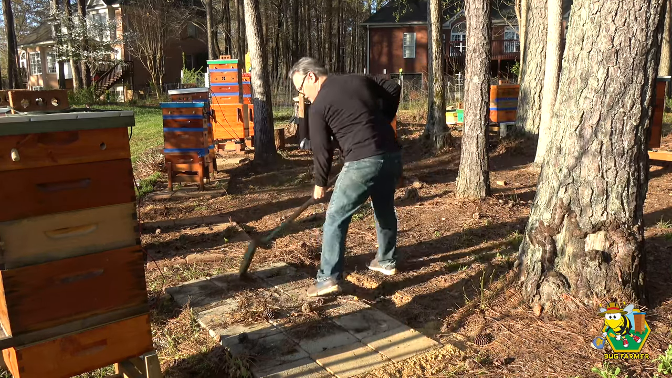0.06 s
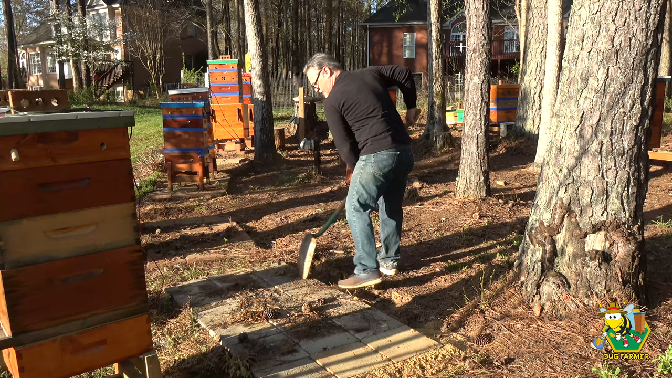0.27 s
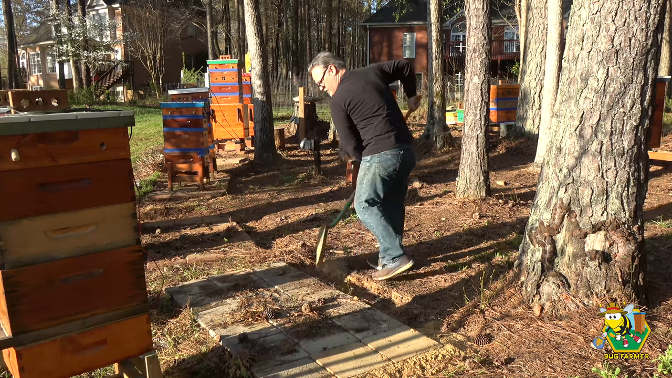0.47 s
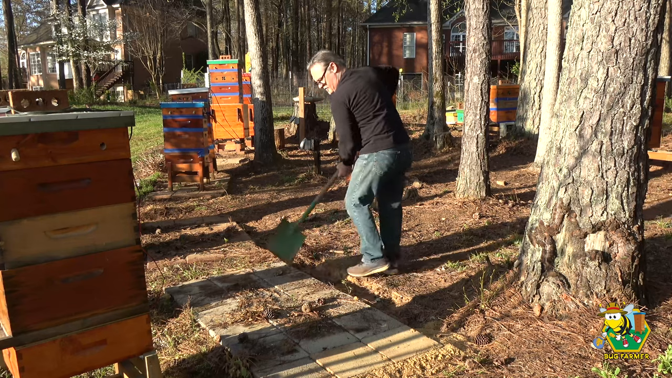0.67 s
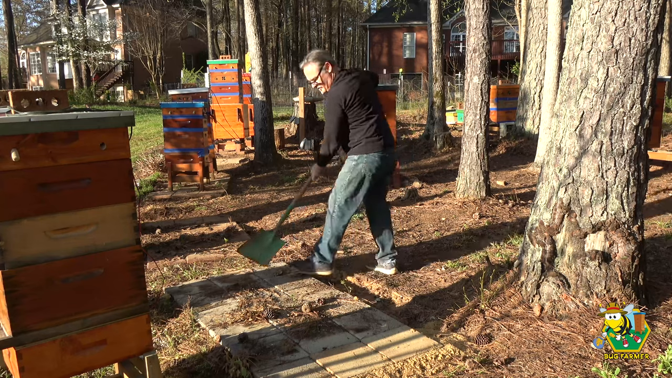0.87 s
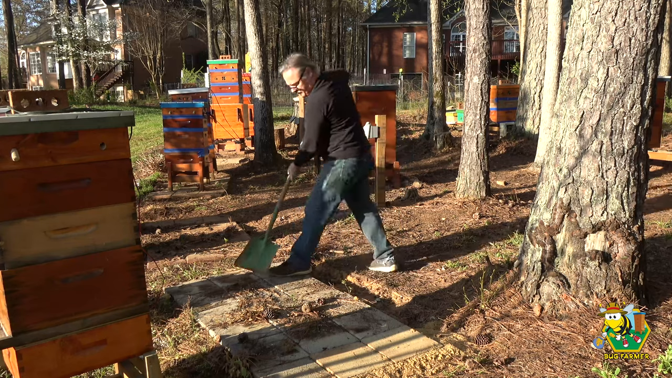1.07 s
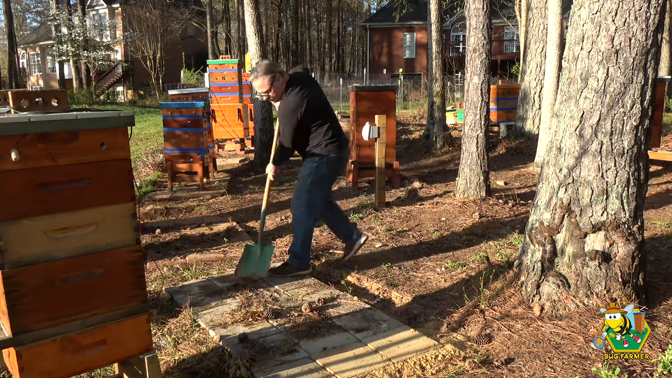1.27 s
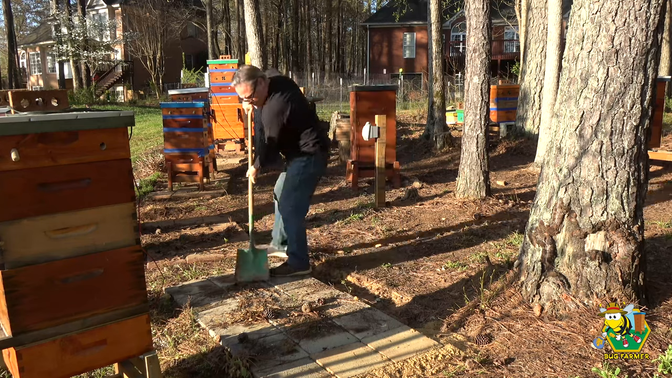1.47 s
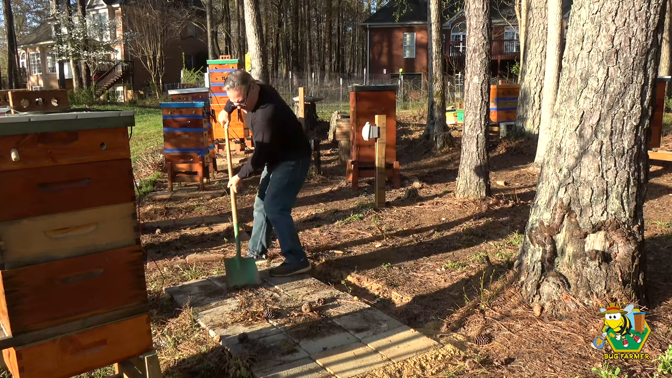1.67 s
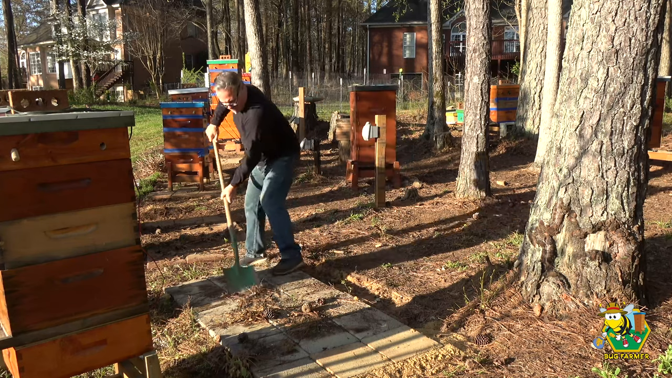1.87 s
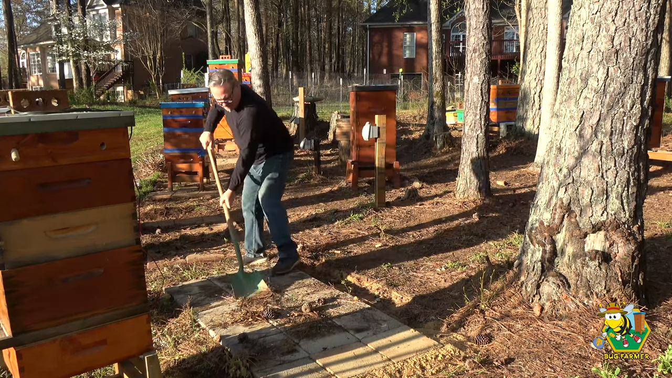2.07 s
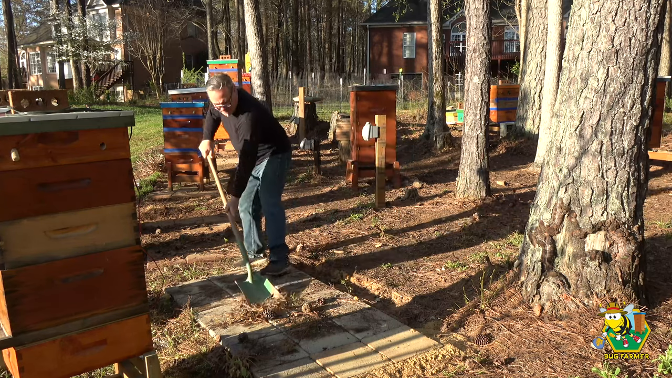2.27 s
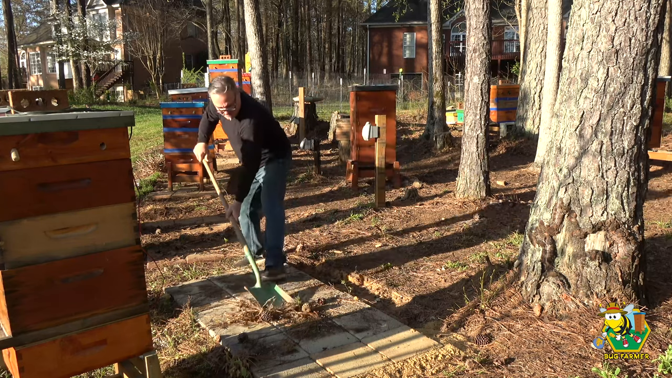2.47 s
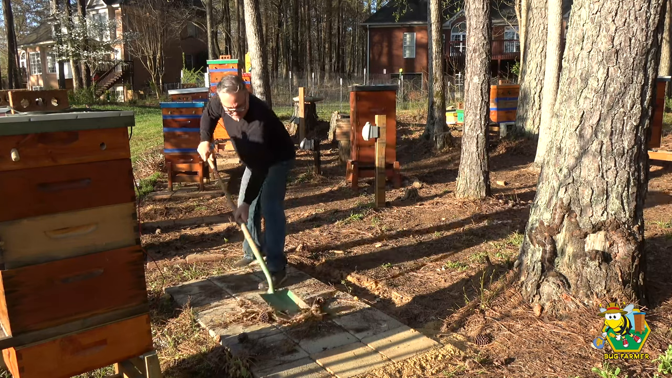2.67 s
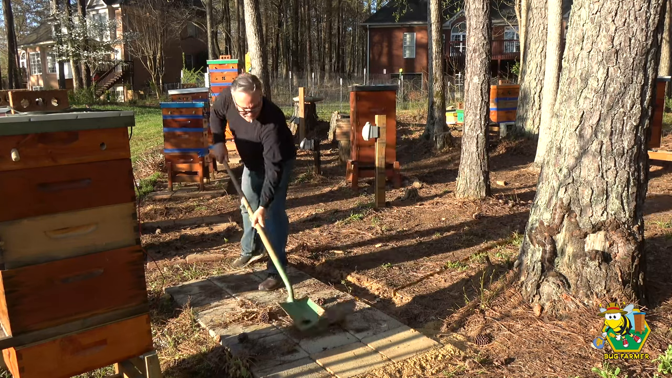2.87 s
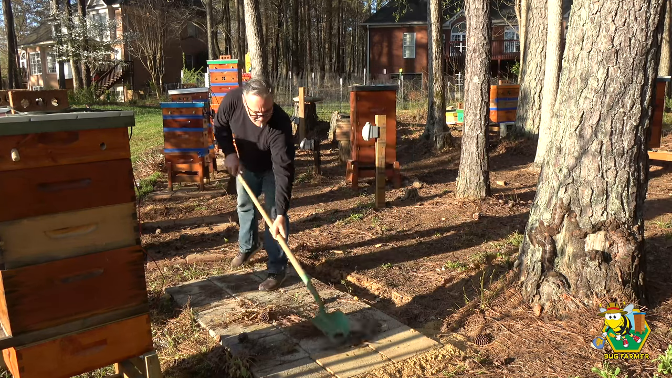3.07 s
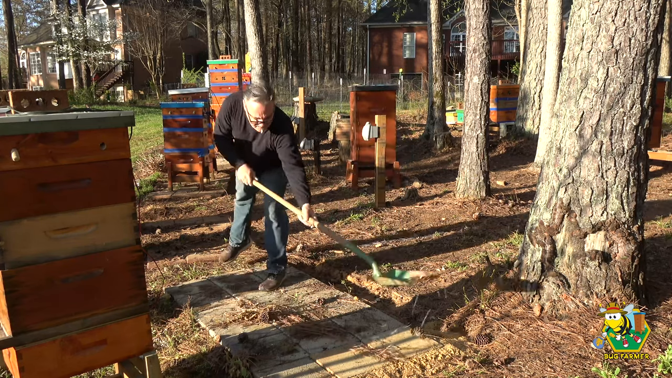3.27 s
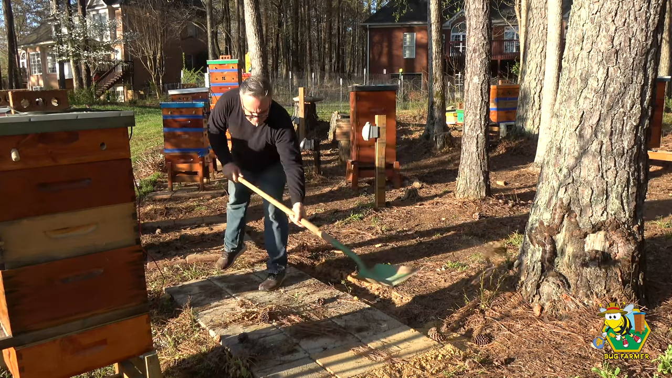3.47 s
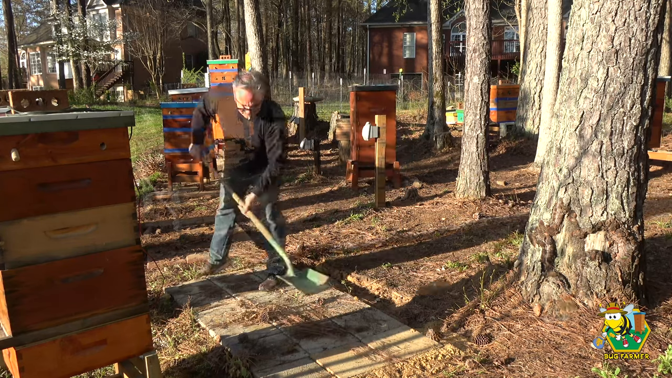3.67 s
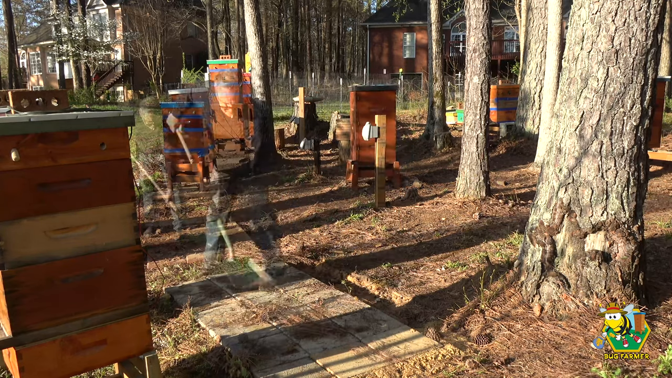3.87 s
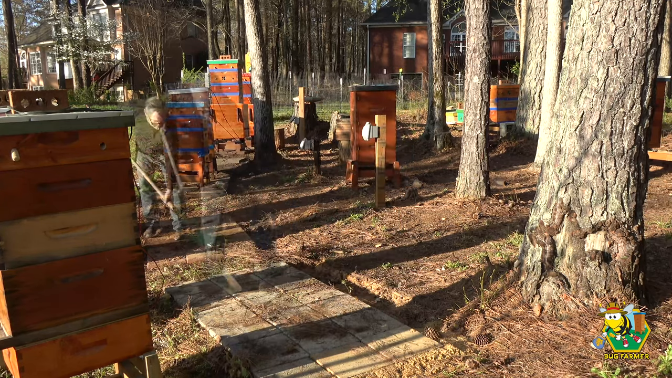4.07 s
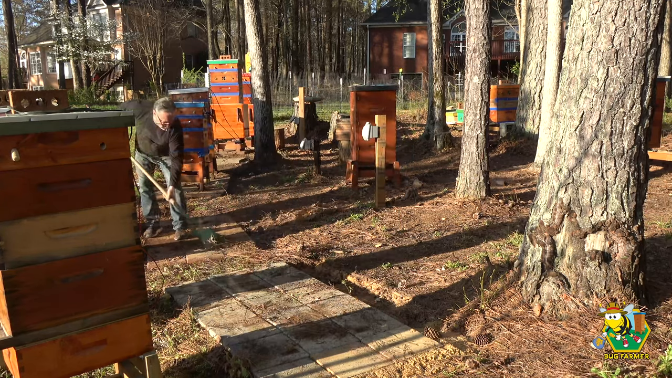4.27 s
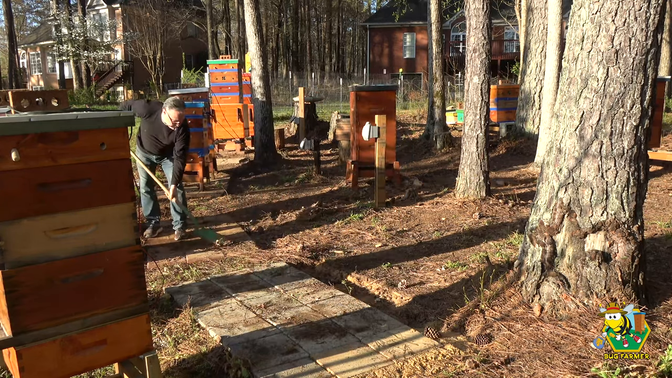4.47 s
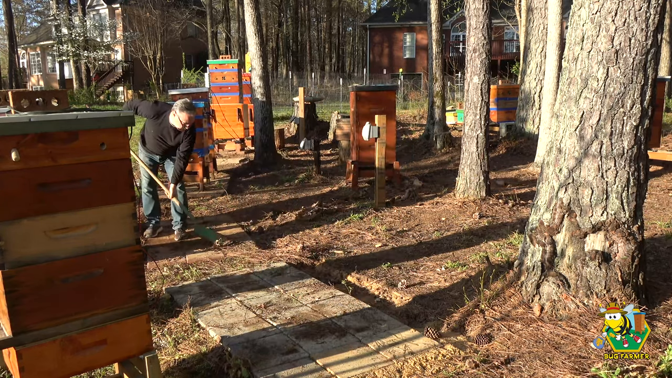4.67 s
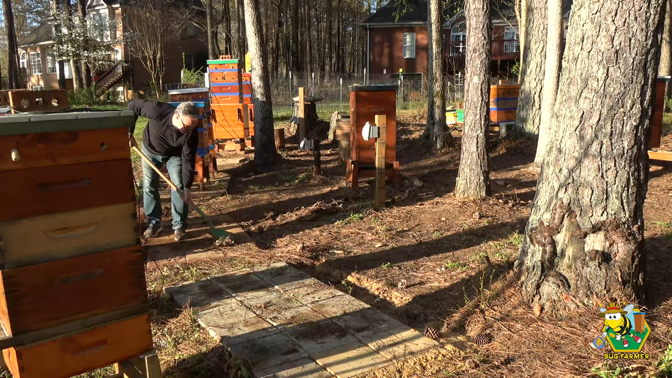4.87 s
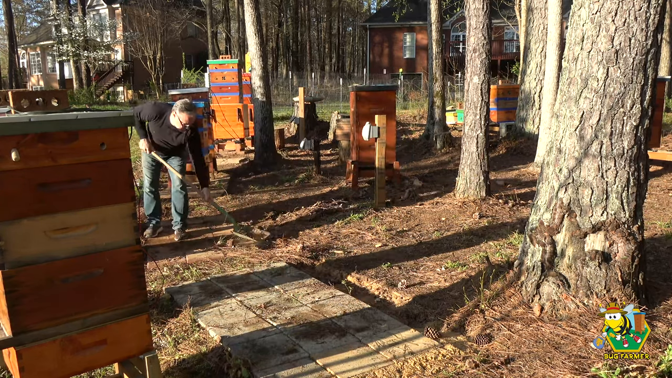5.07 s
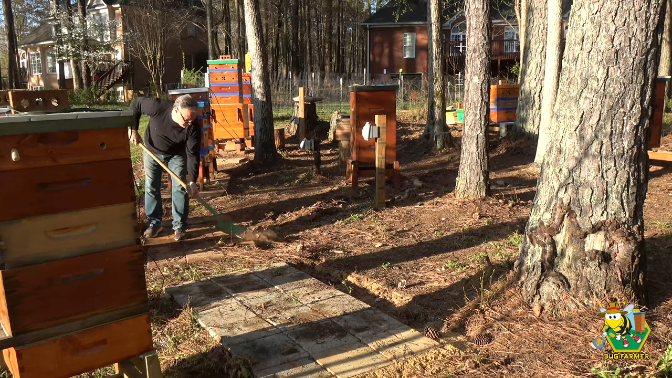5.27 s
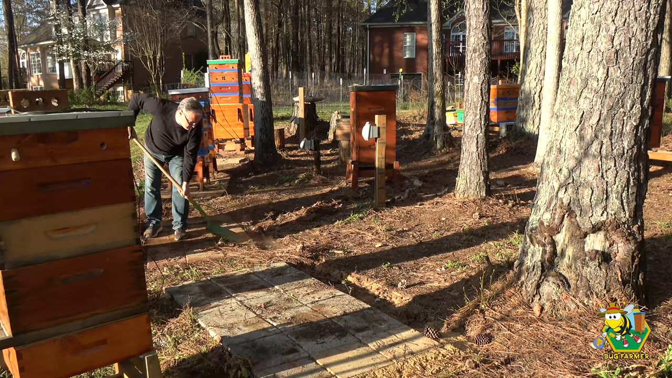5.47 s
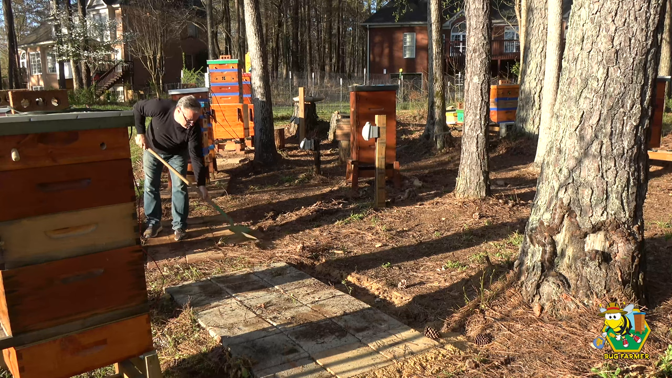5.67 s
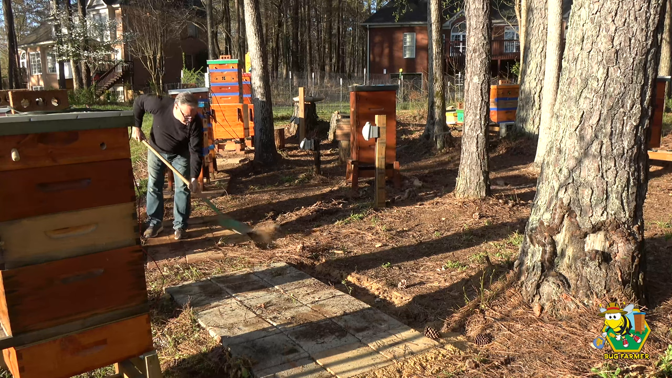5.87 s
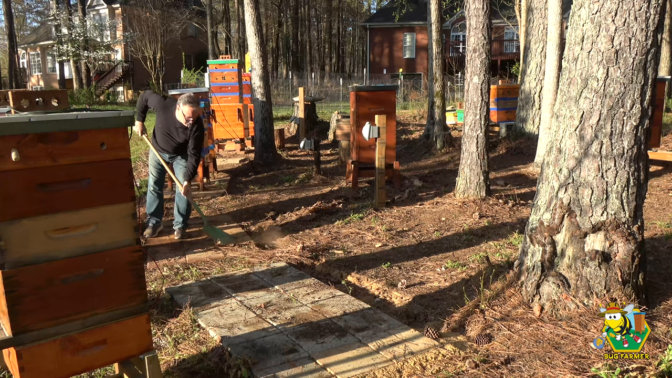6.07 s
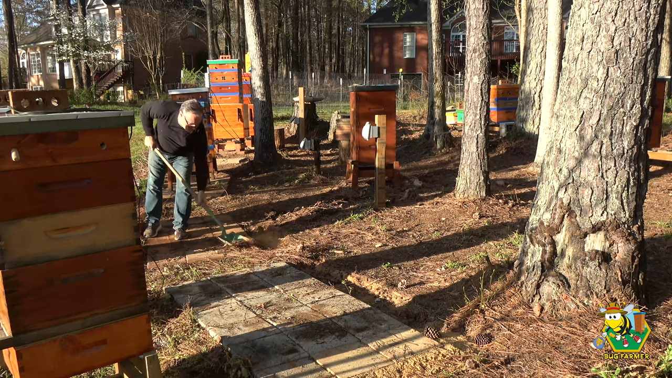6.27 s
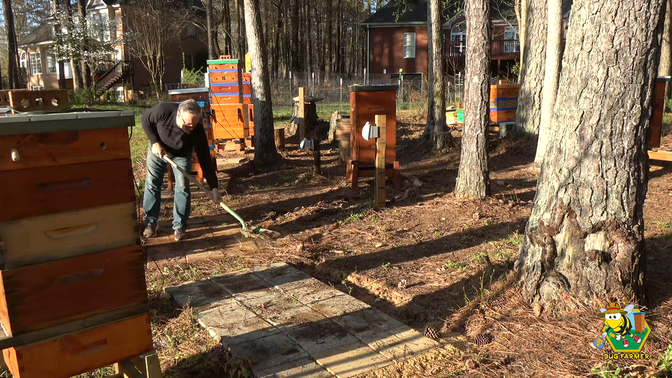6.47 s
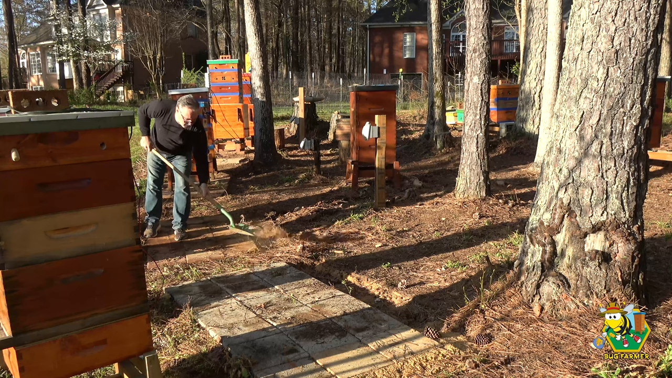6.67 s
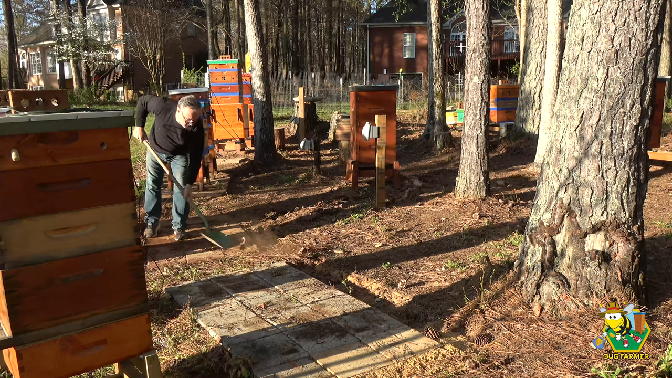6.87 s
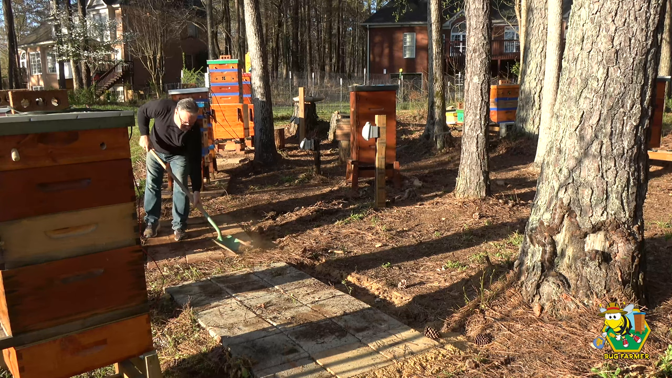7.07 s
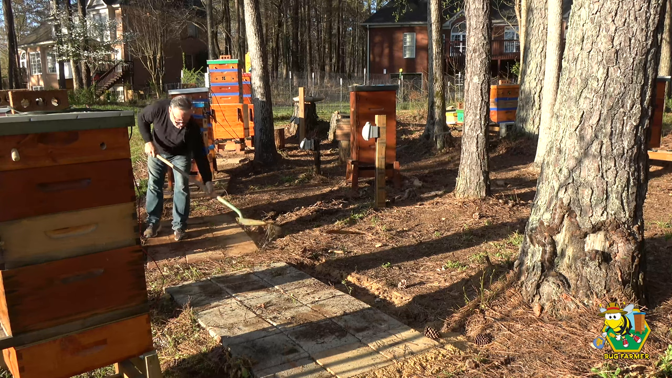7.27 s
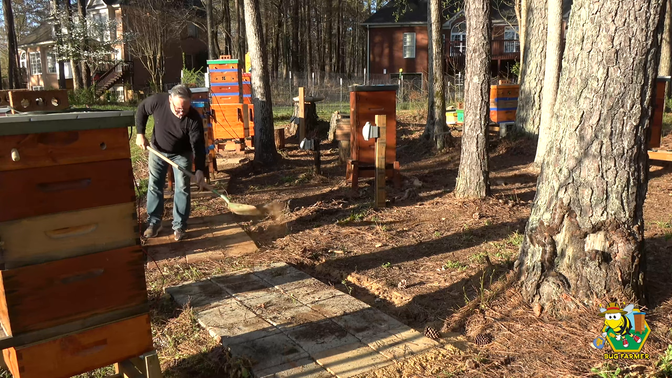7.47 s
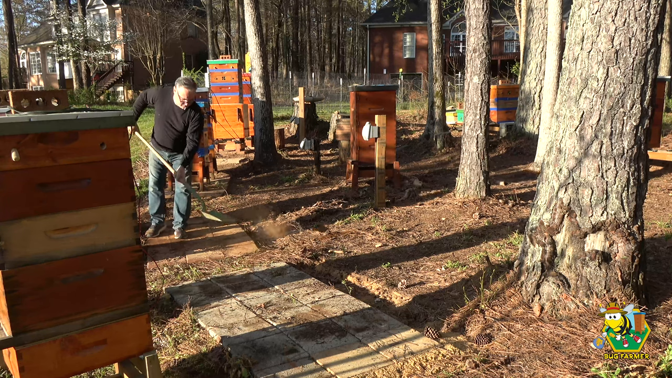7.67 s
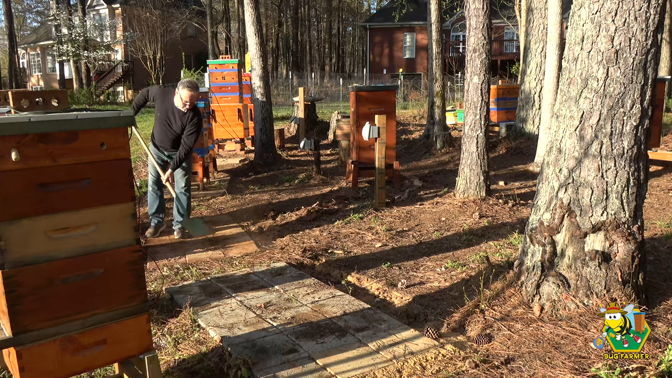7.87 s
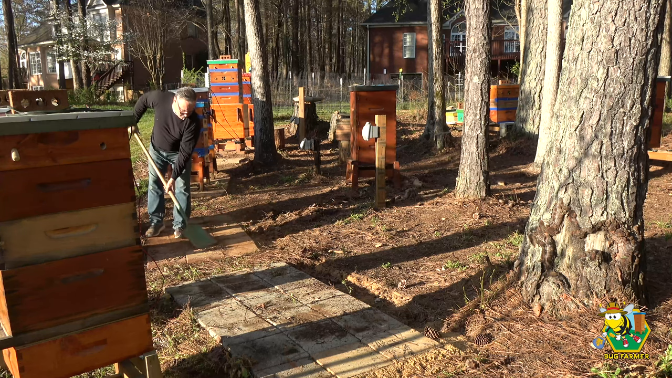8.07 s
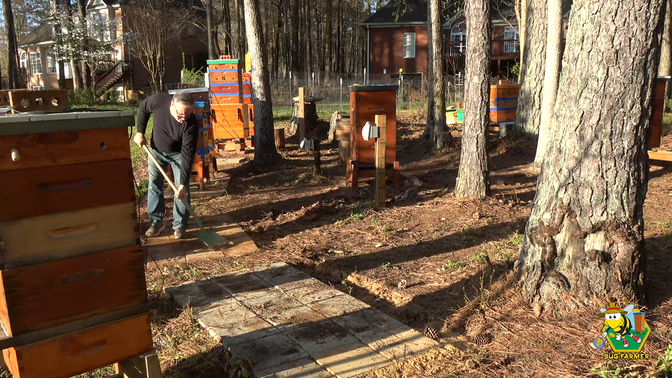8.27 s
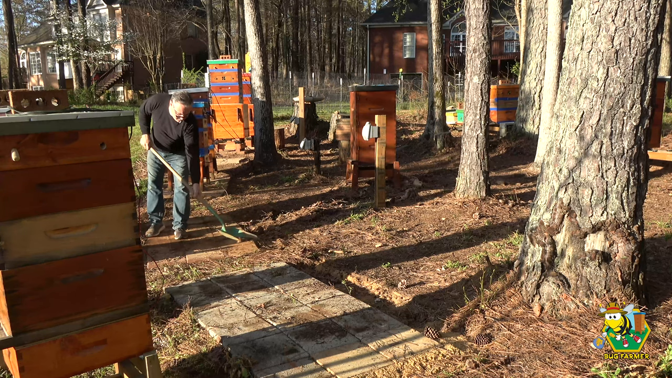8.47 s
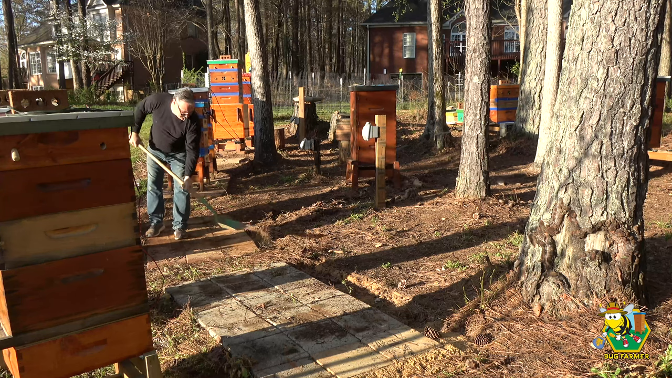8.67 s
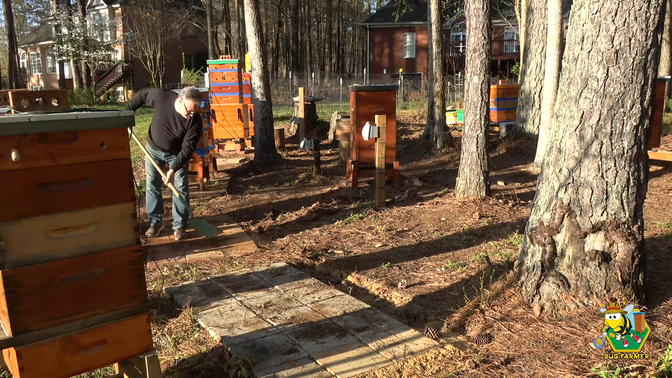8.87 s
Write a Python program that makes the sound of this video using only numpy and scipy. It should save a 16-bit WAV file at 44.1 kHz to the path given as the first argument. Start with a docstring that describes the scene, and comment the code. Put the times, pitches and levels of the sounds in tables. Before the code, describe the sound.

A metal shovel scrapes and clanks over concrete slabs, then pushes through gritty soil, with faint birds outdoors.

```python
"""Shovel on concrete and soil.

A steel shovel is knocked clean, dragged over slabs and pushed through gritty soil in a wooded yard.
Grit crushed under the edge hisses and sets the blade ringing; clods fall, feet rustle dry litter.
Small birds whistle and trill over distant traffic hum; later a light wind rumbles on the microphone."""
import sys
import numpy as np
from scipy import signal
from scipy.fft import rfft, irfft, next_fast_len
from scipy.io import wavfile
from scipy.ndimage import uniform_filter1d

SR = 44100
rng = np.random.default_rng(int(sys.argv[2]) if len(sys.argv) > 2 else 0)


def persist_wave(psi):
    """Save psi, clipped to +-1, as 16-bit WAV."""
    counts = np.round(np.clip(psi, -1, 1) * 32767).astype(np.int16)
    wavfile.write(sys.argv[1], SR, np.atleast_2d(counts).T)


N = 393372
TIME_S = np.arange(N) / SR
MOVE_S = 4.0   # from slabs to soil

# crushed grit spectrum: f/Hz, density/dB
GRIT_SPECTRUM = [(180, -51), (300, -29), (519, -18), (689, -12), (870, -8), (1060, 11.5), (1580, -6),
                 (1780, 13.5), (2740, -13), (3890, 4.5), (7440, 8.5), (9710, 5.5), (16000, -31)]
HOPS_S, HOP_WIDTH_S, HOP_DB = (1.916, 2.05), 0.010, -8   # edge skips over slab joints


def shovel():
    """The edge catches and slips on hissing grit; the same grains drive the blade."""
    coarse, fine = grains(4000, 3.5, 1.0), grains(4000, 0.94, 0.72)
    hops = sum(np.exp(-((TIME_S - s) / HOP_WIDTH_S) ** 2) for s in HOPS_S)
    slip = amp(1.8 * drift(60) + HOP_DB * hops)
    grit = coloured([coarse, fine], GRIT_SPECTRUM, 310.8, flicker_db=2, rate_hz=25)
    hiss = band(grit, 1450, 7430) / np.std(band(grit, 4870, 6750))
    in_soil = TIME_S > MOVE_S
    pebbles = amp(-10 + 2 * in_soil) * unit_band(grains(700, 3.8, 0), 3500, 11000)
    envelopes = strokes()
    level, sand, grind, scoop, weight = (slip * gate(envelopes, column) for column in range(1, 6))
    rasp = grind * unit_band(fine, 1505, 2100) + scoop * unit_band(fine, 703, 1430)
    crunch, thump, kick = knocks(grit, coarse, fine)
    edge = level * (hiss + pebbles) + sand * unit_band(grit, 5680, 14660) + amp(-4) * rasp + crunch
    edge += amp(-3 - 2.25 * in_soil) * sheen(level * coarse + kick)
    bending, ringing = blade(coarse, weight, scoop, grind, in_soil)
    highpass = signal.butter(4, 570, "high", fs=SR, output="sos")   # no bass below about 570 Hz from the edge and its ringing
    return thump + bending + signal.sosfilt(highpass, edge + ringing)


# scrapes: t/s, grit/dB, edge grind/dB re grit, scoop resonance/dB re grit
CLEANING_SCRAPE = [(0, -30.5, 3, 4), (.04, -31.5, -6, -8.5), (.13, -37, 3, -10.5), (.245, -31, -7, -6),
                   (.256, -24, 5, -2), (.312, -21, -15, -7.5), (0.348, -29.5, -4, 0), (.43, -43.5, -6, -7),
                   (.62, -47.5, -11, -26)]
SLAB_DRAG = [(1.684, -44, -14, 9), (1.698, -26, 13.5, 12.5), (1.731, -15, -11, -7), (1.801, -17, 7, 2),
             (1.85, -18, 3, 3.5), (1.9, -19.5, 2, 2), (1.929, -18.5, 0, -3), (1.957, -22.5, 7.5, 8),
             (2.037, -22.5, -6, -4), (2.045, -22.5, 1.5, -1), (2.096, -22, 4.5, 4.5), (2.125, -42, -7, -2)]
RAKE_AND_SLIDE = [(2.125, -34, 4, 5), (2.183, -33.5, -0.5, 0.5), (2.364, -35.5, -1, 3),
                  (2.707, -31, -7, -5.5), (2.899, -27, -6, -3.5), (3.019, -31, 1, 1.5),
                  (3.13, -29, -5, -10), (3.17, -43.5, 2, 0), (3.212, -43, -11, -21)]
# pushes into soil: touch/s, run-up/s, cut/s, hardest point/share of cut, touch/dB, hardest/dB,
# sag at bite/dB, sag at lift/dB, then sand, grind, scoop, weight on blade/dB re grit
SOIL_PUSHES = [(4.771, 0.08, .21, 0.34, -28, -13, 4, 10, -1, -7, -23, -25.5),
               (5.467, 0.083, 0.16, 0.75, -40, -14, 5.5, 8, 0, -5.5, -13.5, -18),
               (6.147, 0.036, 0.25, 0.2, -21.5, -16.5, -1, 5.5, -2.5, -6, -10, -16.5),
               (7.022, 0.034, 0.13, 0.76, -34, -14.5, 6.5, 10, -2, -4.5, -7, -24),
               (8.188, 0.0022, 0.086, 0.47, -36, -20.5, -0.5, 1.5, -4.5, -4.5, -8, -16),
               (8.314, 0.0016, 0.014, 0.27, -38, -30.5, -2, 4.5, -14, 3, 4, -24)]
BITE_S, LIFT_S, LIFT_DROP_DB = 0.012, 0.042, 23.5
SPILL_S, SPILL_DB_PER_S = 0.52, 60
BODY_FOLLOWS = 0.8   # blade's share of the grit's dB swing


def strokes():
    """Scrapes, then pushes that bite, lift and spill. Rows: t, grit, sand, grind, scoop, weight."""
    scrapes = [(CLEANING_SCRAPE, -4, -0.5), (SLAB_DRAG, -2.5, -6.5), (RAKE_AND_SLIDE, -0.5, -8)]
    out = [[(s, db, sand_db, grind, scoop, scoop + weight_db) for s, db, grind, scoop in rows]
           for rows, sand_db, weight_db in scrapes]
    for touch, run_up, cut, share, touch_db, top_db, bite_sag, lift_sag, sand_db, *body in SOIL_PUSHES:
        bite = touch + run_up
        lift = bite + cut
        hardest = bite + BITE_S + share * (cut - BITE_S)
        spill_db = top_db - lift_sag - LIFT_DROP_DB
        shape = [(touch, touch_db), (bite, touch_db), (bite + BITE_S, top_db - bite_sag),
                 (hardest, top_db), (lift, top_db - lift_sag), (lift + LIFT_S, spill_db),
                 (lift + LIFT_S + SPILL_S, spill_db - SPILL_S * SPILL_DB_PER_S)]
        out.append([(s, db, sand_db, *(np.array(body) + (1 - BODY_FOLLOWS) * (top_db - db)))
                    for s, db in shape])
    return out


# blade knocks on stone and in soil, and rings as it lifts: t/s, crunch/dB, damped clang/dB, free ring/dB,
# favoured f/Hz, thump/dB
BLADE_KNOCKS = [(0.0978, -8.5, -39.5, -27.5, 1110, -19.5), (0.1998, -42, -22, -47, 1480, -45),
                (0.2498, -6, -16, -54, 644, -15), (0.299, -4, -29, -9, 3000, -19.5),
                (0.3040, -30, -46, -4, 2660, -49.5), (0.3070, -33, -12, -40, 3700, -50),
                (0.325, -37, -34, -19, 1450, -50), (0.3337, -29, -29, -25.5, 610, -34),
                (0.345, -40, -30, -13.5, 2980, -50), (0.5758, -44, -61, -40, 1110, -65),
                (1.694, -42, -38, -21, 1960, -37), (2.0064, -10.5, -34, -47, 1820, -35),
                (2.0289, -7.5, -19, -29, 1020, -37), (2.0958, -34, -29.5, -24, 2360, -43),
                (2.139, -26, -26, -32.5, 724, -24), (2.1616, -15.5, -33, -64, 1080, -47),
                (2.2206, -16, -47, -23, 1820, -34), (2.23, -15, -40, -50, 5250, -35),
                (2.3375, -30, -25.5, -54, 1890, -63), (2.394, -20.5, -21, -38, 2910, -33),
                (2.4134, -17.5, -40, -19, 1750, -41), (2.421, -17, -20, -45, 4630, -37),
                (2.4560, -23, -24, -52, 1900, -37), (2.742, -40, -40, -55, 2300, -46),
                (2.832, -16, -40, -55, 2300, -43), (2.859, -17, -34, -55, 2300, -50),
                (3.0270, -24, -30, -59, 800, -35), (3.068, -15.5, -28, -30, 1820, -46),
                (3.0836, -11.5, -7.5, -25, 1560, -24), (3.091, -17, -24, -28, 2220, -34),
                (3.1280, -46, -21, -38, 1850, -45), (4.6289, -53, -37, -64, 685, -60),
                (4.775, -19, -26, -29.5, 1950, -45), (4.783, -29, -21.5, -37, 5340, -57),
                (4.8166, -18, -25, -36, 1130, -60), (4.8470, -20, -34, -41, 900, -38),
                (4.867, -15, -41, -34, 1770, -47), (4.957, -23, -17.5, -46, 2050, -48),
                (5.0100, -33, -21, -48, 1320, -40), (5.068, -52.5, -21.5, -49, 1120, -63),
                (5.499, -20, -18, -43, 980, -29), (5.501, -32, -45, -30, 1830, -44),
                (5.583, -10.5, -20, -25, 1850, -39), (5.7106, -41, -20, -28, 1980, -29),
                (5.7160, -28, -19.5, -29, 2650, -33), (5.7300, -46, -22, -37.5, 1108, -48),
                (6.1535, -31, -21, -31, 3000, -31), (6.209, -21.5, -39, -45, 1400, -38),
                (6.2840, -21, -22, -47, 2000, -37), (6.3420, -43, -23.5, -56, 700, -30),
                (6.398, -24, -38, -45, 1400, -45), (6.4175, -35, -17, -48, 1850, -50),
                (7.0187, -58, -38, -34.5, 610, -22), (7.043, -15.5, -22, -51, 810, -35),
                (7.1178, -13, -13, -38, 1130, -46), (7.1688, -25, -21.5, -36, 1220, -50),
                (7.195, -46, -24, -43, 1108, -54), (8.195, -18.5, -24, -42, 1841, -42),
                (8.2659, -14, -11, -22.5, 1560, -19), (8.321, -32, -14, -52, 2030, -42),
                (8.326, -42, -33, -41.5, 643, -51)]
CLANG_DB_PER_OCT, FREE_DB_PER_OCT = 13, 28


def knocks(grit, coarse, fine):
    """Each impact ticks, crunches grit, thumps and kicks the upper modes."""
    s, crunch_db, *_, thump_db = np.transpose(BLADE_KNOCKS)
    crunch = bursts(s, crunch_db, grit, t60_s=0.044)
    tick = bursts(s, crunch_db - 7, rng.choice([-1., 1.], N), t60_s=0.0077)
    thump = bursts(s, thump_db, unit_band(fine, 237, 850), t60_s=0.09)
    kick = bursts(s, crunch_db - 1, coarse, t60_s=0.005)
    return crunch + tick, thump, kick


def strikes(hz, mode_db):
    """Knock impulses for one mode, damped and free; the struck spot favours modes near one pitch."""
    s, _, clang_db, free_db, favoured_hz, _ = np.transpose(BLADE_KNOCKS)
    at = (s * SR).astype(int)
    struck_db = mode_db + rng.normal(0, 0.31, len(s))
    octaves = np.abs(np.log2(hz / favoured_hz))
    clang, free = np.zeros((2, N))
    clang[at] = amp(struck_db + clang_db - CLANG_DB_PER_OCT * octaves)
    free[at] = amp(struck_db + free_db - FREE_DB_PER_OCT * octaves)
    return clang, free


# blade modes: f/Hz
MODE_HZ = [265, 422, 452, 642, 830, 926, 1108, 1180, 1479, 1840, 1917, 2077, 2294, 2346, 2561, 2947, 3640,
           4035, 4770, 5340, 5850]
# per mode: knock gain/dB, free t60/s, scrape gain/dB, ground-damped t60/s
MODE_RESPONSE = [(-27, .3, -10, 0.031), (2, 0.47, -5, 0.09), (-21, 0.35, -13, 0.08), (1.5, 1.1, -55, 0.19),
                 (-38, 0.18, -13, 0.03), (-9.5, 0.2, -15, 0.12), (-3, 1.1, -13, 0.09),
                 (-18, 0.2, -15, 0.09), (-1.5, 0.24, -17, 0.018), (-4.5, 0.2, -11, 0.09),
                 (-2, 0.22, -7, 0.073), (-16, 0.12, -9, 0.045), (-7.5, 0.13, -11, 0.11),
                 (-2, 0.2, -17, 0.08), (-8.5, 0.18, -12.5, 0.06), (-6.5, 0.21, -15.5, 0.1),
                 (-4, 0.13, -22, 0.08), (-4.5, 0.12, -15, 0.09), (3, 0.09, -15, 0.06),
                 (8, 0.053, -15, 0.045), (-20, .1, -14, 0.025)]
WANDER_SHARE, SOIL_DAMPING_DB = 0.016, -4.5


def blade(grain, weight, scoop, grind, in_soil):
    """Steel modes, scraped and struck; the ground bends the blade, so the higher pitches wander."""
    bending, ringing = np.zeros((2, N))
    for hz, (knock_db, free_t60, scrape_db, damped_t60) in zip(MODE_HZ, MODE_RESPONSE):
        pressure = weight if hz < 500 else scoop if hz < 1500 else grind
        soil_db = 0 if 500 < hz < 1800 else SOIL_DAMPING_DB * in_soil
        scrape = pressure * grain * noise_gain(damped_t60) * amp(scrape_db + 2.8 * drift(7) + soil_db)
        clang, free = strikes(hz, knock_db)
        bent_hz = hz * (1 + WANDER_SHARE * (hz > 700) * drift(9))
        tone = ring_moving(scrape + clang, bent_hz, damped_t60) + ring(free, hz, free_t60)
        if hz < 500:
            bending += band(tone, .9 * hz, 1.1 * hz)
        else:
            ringing += tone
    return bending, ringing


def sheen(drive, low_hz=2700, top_hz=9200, modes=26, t60_s=0.062):
    """Crowded upper modes of the sheet, each swelling and fading as the contact shifts."""
    pitches = np.geomspace(low_hz, top_hz, modes) * rng.uniform(.98, 1.02, modes)
    tones = (ring(drive * amp(5 * drift(11) - 2.5 * np.log2(hz / low_hz)), hz, t60_s) for hz in pitches)
    return noise_gain(t60_s) / np.sqrt(modes) * sum(tones)


# dry litter spectrum: f/Hz, density/dB
LITTER_SPECTRUM = [(180, -46), (300, 3), (614, -15), (689, 4.5), (915, -2), (5800, 5), (10600, -0.5),
                   (16000, -23)]
# steps: peak t/s, swell/s, fade/s, level/dB
FOOTSTEPS = [(.49, 0.039, 0.034, -39.5), (.58, .03, 0.078, -48), (.78, .02, 0.065, -49),
             (1.154, 0.064, 0.02, -43), (1.4, 0.083, .02, -47.5), (1.643, 0.059, 0.097, -30.5),
             (3.705, 0.018, 0.091, -33), (3.745, .05, 0.026, -35), (3.9, 0.051, 0.08, -27),
             (3.94, .04, 0.034, -32), (4.0, .1, .1, -43), (3.8, .08, 0.1, -44.5),
             (4.091, 0.077, 0.017, -36), (4.135, 0.031, 0.08, -40.5), (4.47, 0.031, 0.097, -42),
             (4.636, 0.016, 0.046, -38), (5.429, 0.028, 0.41, -44), (6.098, 0.023, 0.049, -40),
             (6.885, 0.055, 0.13, -38.5), (7.844, 0.053, 0.064, -44), (8.01, 0.025, 0.033, -53)]


def footsteps(floor_db=-35):
    """Litter crackles underfoot; the floor lies two swell or fade times from each peak."""
    crackle = [grains(1500, 4.5, .6), grains(1500, 4.0, .6)]
    rustle = coloured(crackle, LITTER_SPECTRUM, 309, flicker_db=1.5, rate_hz=30)
    envelopes = [[(s - 2 * swell, db + floor_db), (s, db), (s + 2 * fade, db + floor_db)]
                 for s, swell, fade, db in FOOTSTEPS]
    return gate(envelopes, 1) * rustle


# litter ticks and falling clods: t/s, snap/dB, thud/dB re snap
TICKS_AND_SNAPS = [(1.117, -42, 15.5), (1.353, -38.5, -1), (1.4022, -40, 6), (1.5307, -37.5, 1),
                   (3.203, -31, -22), (3.2171, -23, -8), (3.2207, -15, -26), (3.24, -24, -25),
                   (3.2437, -12.5, -22), (3.306, -30, -26), (3.321, -19, -28), (3.343, -18, -21),
                   (3.3442, -19, -5), (3.423, -36, -15), (3.452, -17.5, -15), (3.473, -34, -24),
                   (3.5185, -34, 2), (3.554, -39, -14), (3.702, -39, -12), (3.752, -38, -12),
                   (3.852, -42, -15), (3.897, -22, -19), (3.935, -35, -12), (4.019, -37, -5),
                   (4.037, -33.5, -7), (4.059, -44, -4), (4.084, -34, -1), (4.096, -34, -3),
                   (4.121, -27.5, -11), (4.142, -45, -8), (4.195, -38, -5), (7.738, -45, -2),
                   (8.418, -37, -6), (8.4474, -45, 3)]


def ticks_and_snaps():
    """Dry litter ticks underfoot; falling clods snap and thud."""
    s, db, thud_db = np.transpose(TICKS_AND_SNAPS)
    snaps = bursts(s, db, noise_band(2670, 7300), t60_s=0.023)
    cracks = bursts(s, db - 0.5, noise_band(4100, 13300), t60_s=0.0083)
    thuds = bursts(s, db + thud_db, noise_band(520, 1240), t60_s=0.022)
    return snaps + cracks + thuds


# bird glides: t/s, length/s, start f/Hz, target f/Hz, relative level/dB
BIRD_GLIDES = [(0.603, 0.058, 3370, 3140, -52), (0.673, 0.053, 4450, 3830, -49),
               (0.793, 0.089, 3640, 3400, -53), (1.006, 0.07, 3170, 3340, -50),
               (1.064, 0.076, 4640, 3650, -51), (1.19, 0.081, 3680, 3380, -51),
               (1.278, 0.042, 3250, 3370, -49), (1.308, 0.035, 3650, 3530, -45),
               (1.417, 0.2, 2220, 2520, -50), (1.415, 0.039, 3230, 3200, -48),
               (1.477, 0.062, 3380, 3160, -51), (3.52, 0.045, 6030, 6900, -47),
               (3.585, 0.34, 2170, 2530, -53), (3.646, 0.02, 4400, 5900, -42),
               (3.823, 0.035, 6200, 6850, -48), (4.055, 0.033, 6200, 6900, -55),
               (4.148, 0.027, 6320, 6930, -46), (3.99, 0.3, 2170, 2506, -50),
               (4.233, 0.047, 6160, 6850, -49.5), (6.724, 0.096, 2280, 2580, -50),
               (6.902, 0.04, 3220, 3200, -48), (6.95, 0.075, 4650, 3750, -47),
               (7.28, 0.15, 2430, 2500, -52.5), (7.304, 0.044, 3230, 3240, -43.5),
               (7.54, 0.052, 6000, 7160, -53), (7.766, 0.068, 3140, 3350, -53),
               (8.635, 0.046, 2950, 2970, -52), (8.766, 0.034, 3260, 3300, -51)]


def whistles(gain_db=-3.5):
    """Far birds: warbling sines that fall evenly or rise and level out."""
    out = np.zeros(N)
    warble = 1 + .006 * drift(62)
    flutter_db = 4.5 * drift(70)   # distance and leaves break up the tone
    for s, length, from_hz, to_hz, db in BIRD_GLIDES:
        i, n = round(s * SR), round(length * SR)
        glide = np.linspace(0, 1, n)
        if to_hz > from_hz:
            settle = .3 * length / (length + .05)
            glide = 1 - np.exp(-glide / settle)
        hz = (from_hz + (to_hz - from_hz) * glide) * warble[i:i + n]
        envelope = amp(db + gain_db + flutter_db[i:i + n]) * signal.windows.tukey(n, .35)
        out[i:i + n] += envelope * sine(hz)
    return out


def trill(start_s=0.46, period_s=0.0768, pair_lag_s=0.0053, sweep_s=0.011, db=-37.5, pan_db=1.2):
    """A bird slightly to the left: eight notes, each a pair of falling sweeps."""
    out, n = np.zeros((2, N)), int(sweep_s * SR)
    sweep = np.hanning(n) * sine(np.geomspace(9000, 4460, n))
    for s in start_s + period_s * np.arange(8):
        for i in (round(s * SR), round((s + pair_lag_s) * SR)):
            out[:, i:i + n] += amp([[db + pan_db], [db - pan_db]]) * sweep
    return out


# traffic and air spectrum: f/Hz, density/dB
TRAFFIC_SPECTRUM = [(21, -30), (35, 0), (123, -4.5), (176, -11.5), (389, -15), (443, -48), (557, -14.5),
                    (1140, -17), (1640, -24), (4560, -29), (6040, -35), (14800, -37), (16000, -43.5)]
# hum envelope: t/s, level/dB
TRAFFIC_LEVEL = [(0, -40.5), (3.0, -42), (4.8, -44), (8.92, -43.5)]
# left-right likeness: f/Hz, coherence/0..1
TRAFFIC_COHERENCE = [(60, 1), (180, 0.88), (550, 0.88), (1650, 0.96), (4970, 0.31), (15000, 0.073)]


def traffic():
    """Distant traffic and air: alike on both sides in the bass, diffuse in the treble."""
    mid, side = (coloured(rng.standard_normal((2, N)), TRAFFIC_SPECTRUM, 40.9) for _ in range(2))
    hz = np.fft.rfftfreq(N, 1 / SR) + 1
    coherence = np.clip(at_hz(TRAFFIC_COHERENCE, hz), 0, .99)
    mid = irfft(rfft(mid) * np.sqrt((1 + coherence) / 2), N)
    side = irfft(rfft(side) * np.sqrt((1 - coherence) / 2), N)
    return gain_curve(TRAFFIC_LEVEL) * np.array([mid + side, mid - side])


# far chirr and insect buzz envelopes: t/s, level/dB
CHIRR_LEVEL = [(0, -41), (1.0, -53), (1.3, -93), (3.3, -43.5), (4.5, -73), (8.1, -86), (8.92, -74)]
BUZZ_LEVEL = [(0, -75), (3.2, -70), (3.6, -74), (4.4, -73), (7.9, -70), (8.05, -72), (8.92, -58.5)]


def insects():
    """A broad chirr and a narrow buzz, both flickering."""
    chirr = gain_curve(CHIRR_LEVEL) * amp(2 * drift(20)) * noise_band(4000, 6600, (2, N))
    buzz = gain_curve(BUZZ_LEVEL) * amp(3.8 * drift(13)) * noise_band(5700, 6300, (2, N))
    return chirr + buzz


# gust envelope: t/s, level/dB
WIND_LEVEL = [(0.0, -61), (3.65, -55), (3.92, -49), (4.0, -23.5), (4.45, -40), (5.39, -31), (5.66, -51),
              (5.71, -41), (6.36, -34), (6.46, -41), (6.88, -32), (7.33, -39), (7.43, -31.5), (7.82, -45),
              (8.7, -39), (8.92, -47)]


def wind():
    """Gusts rumble on each microphone port, partly shared."""
    noise = rng.standard_normal((3, N))
    gusts = band(noise[:2] + 0.55 * noise[2], 11.3, 27.0)
    return gain_curve(WIND_LEVEL) * unit_band(gusts, 9.1, 21.7)


def tree_echoes(x, t60_s=1, delay_s=0.012):
    """Dull scatter off trunks: a decaying noise response of unit energy per side."""
    t = np.arange(int(1.2 * SR)) / SR
    tail = band(rng.standard_normal((2, len(t))), 190, 7600) * amp(-60 * t / t60_s) * (t > delay_s)
    tail /= np.sqrt(np.sum(tail ** 2, axis=1, keepdims=True))
    return signal.fftconvolve(x[None], tail, axes=1)[:, :N]


def ports(x, slab_lag_s=5e-6, soil_lag_s=1e-5):
    """Sound reaches two close ports a moment apart; moving scatter unsettles the treble between them."""
    size, pairs = next_fast_len(N), []
    spectrum = rfft(x, size)
    for lag in (slab_lag_s, soil_lag_s):
        turn = np.exp(1j * np.pi * np.fft.rfftfreq(size, 1 / SR) * lag)
        pairs.append(irfft([spectrum * turn, spectrum / turn], size)[:, :N])
    scatter = amp(-17) * drift(110) * band(x, 4100, 6100)
    scatter += amp(-10.5) * drift(290) * band(x, 7900, 16000)
    return np.where(TIME_S < MOVE_S, *pairs) + scatter * [[1], [-1]]


def amp(db):
    return 10 ** (np.asarray(db) / 20)


def unit_rms(x):
    return x / np.sqrt(np.mean(x ** 2) + 1e-20)


def sine(hz):
    return np.sin(2 * np.pi * np.cumsum(hz) / SR)


def gain_curve(rows, outside_db=None):
    s, db = np.transpose(rows)
    return amp(np.interp(TIME_S, s, db, outside_db, outside_db))


def gate(envelopes, column):
    """Gain of the loudest envelope, silent between them; later columns are dB re column 1."""
    out = np.zeros(N)
    for rows in map(np.array, envelopes):
        db = rows[:, 1] + (rows[:, column] if column > 1 else 0)
        out = np.maximum(out, gain_curve(np.c_[rows[:, 0], db], outside_db=-200))
    return uniform_filter1d(out, size=90)


def at_hz(points, hz):
    point_hz, values = np.transpose(points)
    return np.interp(np.log(hz), np.log(point_hz), values)


def drift(rate_hz):
    """Smooth random motion, rms 1."""
    r = np.exp(-80 * np.pi * rate_hz / SR)
    slow = signal.lfilter([1], [1, -2 * r, r * r], rng.standard_normal(N // 40 + 2002))[2000:]
    return np.interp(np.arange(N) / 40, np.arange(len(slow)), unit_rms(slow))


def band(x, low_hz, high_hz):
    sos = signal.butter(2, [low_hz, min(high_hz, .45 * SR)], "band", fs=SR, output="sos")
    return signal.sosfilt(sos, x)


def unit_band(x, low_hz, high_hz):
    return unit_rms(band(x, low_hz, high_hz))


def noise_band(low_hz, high_hz, shape=N):
    return unit_band(rng.standard_normal(shape), low_hz, high_hz)


def ring(x, hz, t60_s):
    """A unit click rings a decaying sine of height 1."""
    r, w = amp(-60 / (t60_s * SR)), 2 * np.pi * hz / SR
    return signal.lfilter([0, np.sin(w)], [1, -2 * r * np.cos(w), r * r], x + 1e-18)


def ring_moving(x, hz, t60_s):
    """As ring, with a pitch per sample."""
    turn = np.exp(2j * np.pi * np.cumsum(hz) / SR)
    return np.imag(turn * signal.lfilter([1], [1, -amp(-60 / (t60_s * SR))], x / turn + 1e-18))


def noise_gain(t60_s):
    """Gain at which unit noise rings a mode at rms 1."""
    return np.sqrt(4 * np.log(1000) / (t60_s * SR))


def grains(per_s, spread_db, noise_share):
    """Uneven clicks over smooth noise, rms 1."""
    sizes = amp(spread_db * np.minimum(rng.exponential(1, N), 4.2)) * rng.choice([-1, 1], N)
    clicks = unit_rms(sizes * (rng.random(N) < per_s / SR))
    return unit_rms(clicks + noise_share * rng.standard_normal(N))


def coloured(sources, spectrum, low_hz, flicker_db=0, rate_hz=1):
    """Half-octave bands drawn in turn from two sources, each with its own flicker; rms 1."""
    edges = low_hz * 2 ** np.arange(0, np.log2(20000 / low_hz), .5)
    out = np.zeros(N)
    for k, (low, high) in enumerate(zip(edges, edges[1:])):
        db = at_hz(spectrum, np.sqrt(low * high)) + flicker_db * drift(rate_hz)
        out += amp(db) * band(sources[k % 2], low, high)
    return unit_rms(out)


def bursts(times_s, levels_db, noise, t60_s, attack_s=0.00067):
    """Noise opened sharply at each time, then decaying."""
    gain, t = np.zeros(N), np.arange(int(.3 * SR)) / SR
    shape = amp(-60 * t / t60_s) * np.minimum(t / attack_s, 1)
    for s, db in zip(times_s, levels_db):
        i = round(s * SR)
        gain[i:i + len(t)] += amp(db) * shape[:N - i]
    return gain * noise


def scene():
    """Near work, almost dry; far birds, rich in echo; background."""
    near = shovel() + footsteps() + ticks_and_snaps()
    birds = whistles() + trill()
    echo_send = amp(-36) * near + amp(-5.5) * birds.mean(axis=0)
    return ports(near) + tree_echoes(echo_send) + birds + traffic() + insects() + wind()


def record(dry):
    """Soft-clipped peaks, steep treble cut."""
    lowpass = signal.cheby2(16, 70, 16550, fs=SR, output="sos")
    return signal.sosfilt(lowpass, 1.311 * np.tanh(dry / 1.932))


dry = scene()
out = record(dry)
persist_wave(out)
```